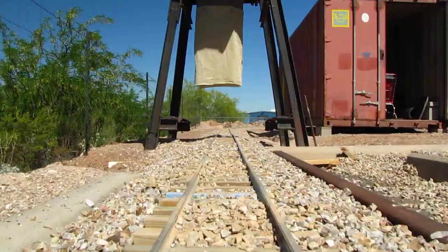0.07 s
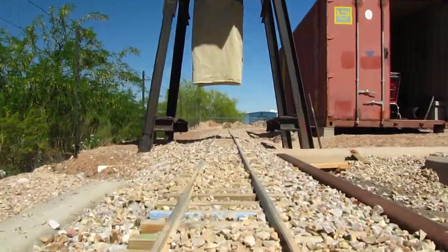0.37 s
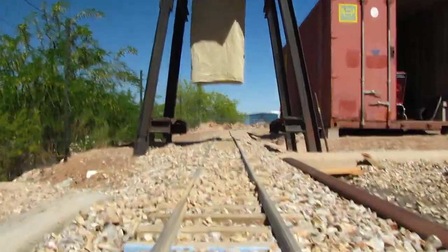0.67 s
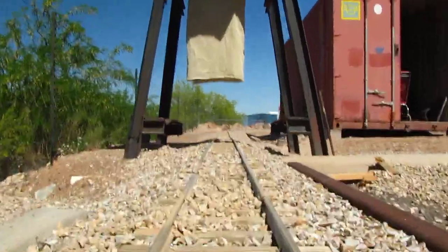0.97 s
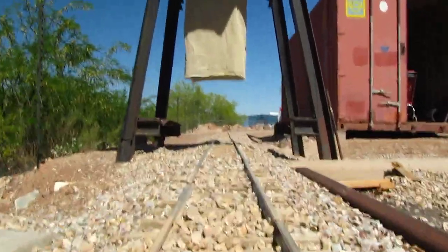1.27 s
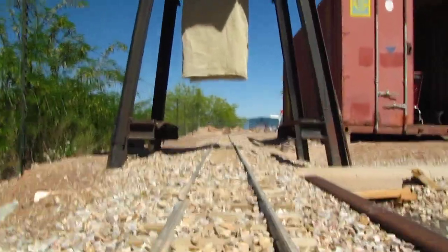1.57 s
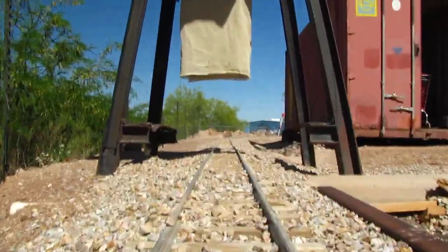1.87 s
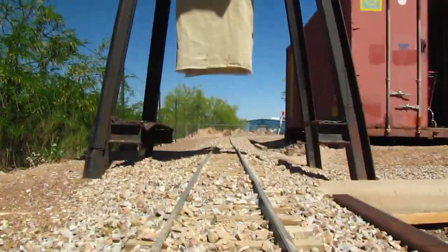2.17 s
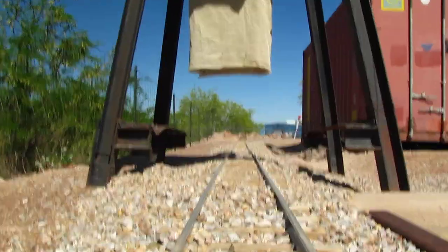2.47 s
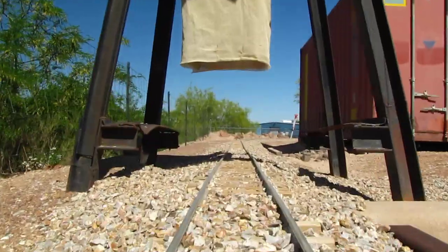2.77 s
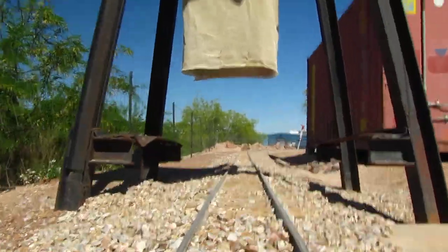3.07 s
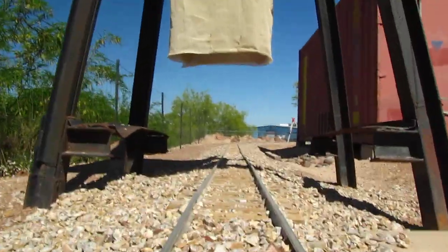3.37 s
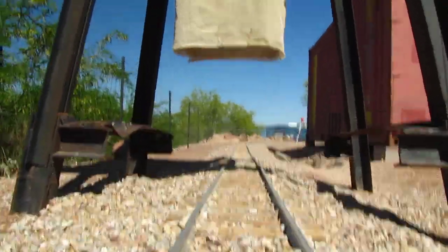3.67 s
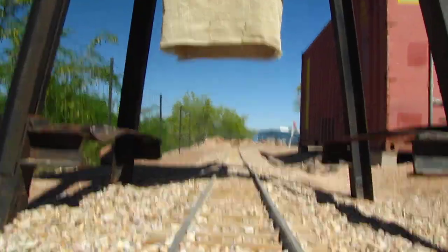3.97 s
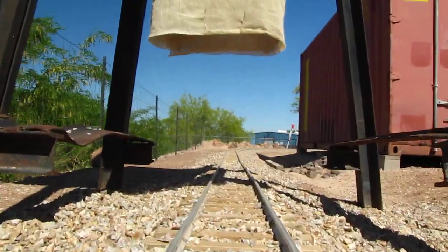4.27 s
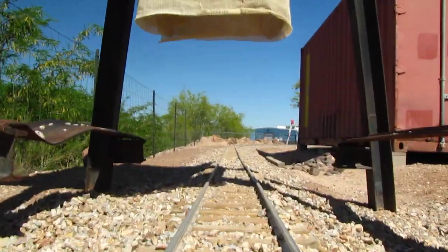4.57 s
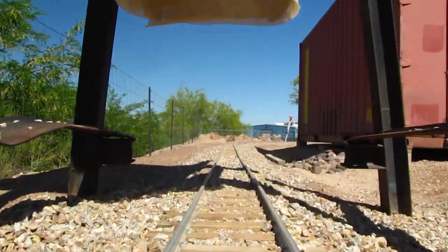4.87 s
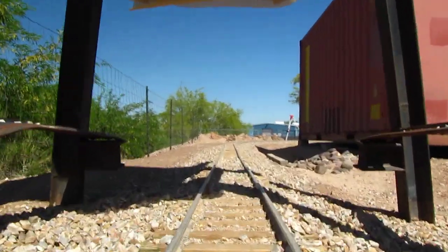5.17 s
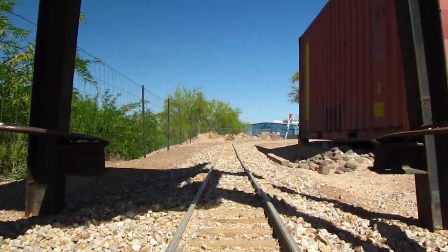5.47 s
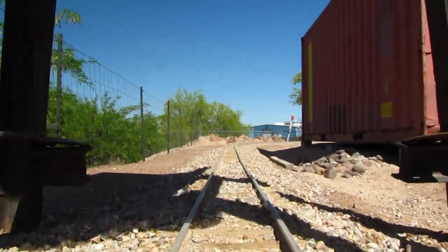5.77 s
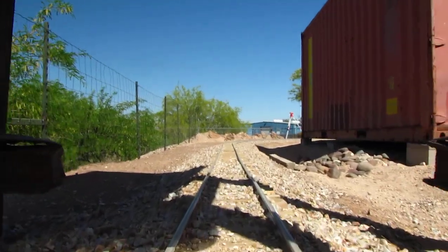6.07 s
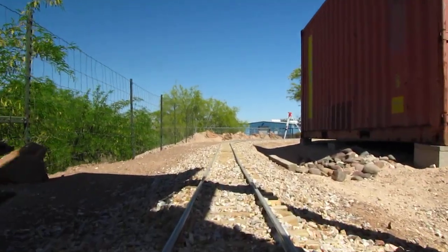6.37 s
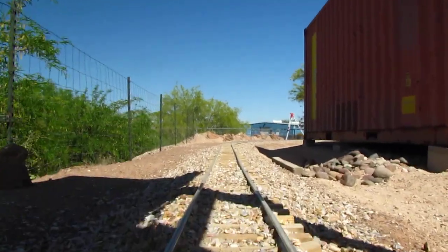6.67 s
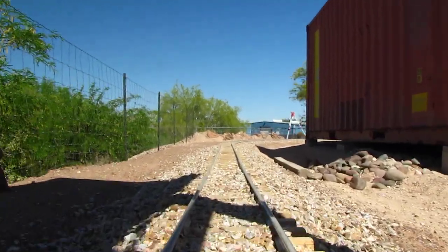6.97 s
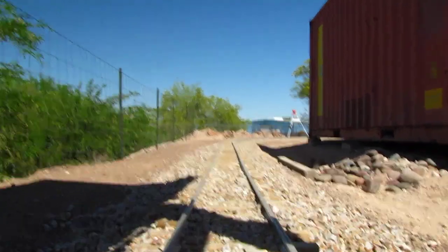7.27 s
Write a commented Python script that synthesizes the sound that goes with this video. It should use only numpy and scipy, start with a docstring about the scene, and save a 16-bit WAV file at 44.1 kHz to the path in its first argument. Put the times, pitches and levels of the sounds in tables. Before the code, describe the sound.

Stones crack and snap under the wheels of a miniature train, which jolts, quietens and then rumbles louder as it gathers speed.

```python
"""Miniature railway car on loose ballast

Heard on board, outdoors, on narrow track. Rail bumps keep body and wheels drumming. For two seconds
the car ploughs through heaped stones, which crunch, snap and ring its steel frame. It jolts over
a few last ones, then rolls clear and grows louder as the drive builds, while rail ripple raises
a climbing hum. Midway a faint high whistle sounds twice."""
import sys
import numpy as np
from scipy import signal
from scipy.io import wavfile
from scipy.ndimage import map_coordinates

SR = 44100
rng = np.random.default_rng(int(sys.argv[2]) if len(sys.argv) > 2 else 0)


def master_out(mix):
    """Clip the mix to full scale and print it as 16-bit PCM to the path in sys.argv[1]."""
    frames = np.transpose(np.atleast_2d(mix))
    ceiling = np.clip(frames, -1, 1)
    pcm = np.round(ceiling * 32767).astype(np.int16)
    wavfile.write(sys.argv[1], SR, pcm)


N = 327222

# wheels dropping off stones: t/s, knock/dB, knock f/Hz, crack/dB, crack decay/s, rattle/dB
JOLTS = [(0.7994, -2, 430, -17, 0.00093, -18), (2.215, -0.5, 400, -25.5, 0.0024, -15),
         (2.355, -2, 930, -31, 0.0032, -38), (2.9235, -2, 358, -26, 0.0023, -16.5),
         (3.079, -3.5, 626, -29.5, 0.0013, -22), (3.113, -4, 674, -24.5, 0.002, -20),
         (3.477, -2.5, 583, -28.5, 0.0049, -19.5), (3.484, -8, 435, -25, 0.0018, -32),
         (3.7, -2, 450, -25.5, 0.0031, -23.5)]
# modes of car body, wheels with axles, steel frame: f/Hz, width/Hz, level/dB
BODY_MODES = [(273.7, 33, -5), (331.7, 50, 1), (365.3, 26.2, -1)]
WHEEL_MODES = [(402.5, 73, -1), (574, 203, -7), (615, 65, -9.5), (863, 277, -9.5), (1162, 160, -11.5)]
FRAME_MODES = [(2080, 26, 9), (2886, 70, 3), (3430, 80, 2.5), (4300, 87, 0), (7210, 120, -7),
               (12600, 380, -18.5)]
# spectra of low rumble, breaking stone, sand and light pebbles: f/Hz, density/dB
RUMBLE_SPECTRUM = [(25, -28), (45, -17), (70, 1), (110, -1.5), (170, -5), (260, 6), (700, -28)]
STONE_SPECTRUM = [(200, -7), (600, 6), (1200, 10), (1900, 6), (2800, 3.5), (4600, 2), (6000, -22.5),
                  (7500, -0.5), (10000, -16.5), (16000, -28.5)]
SAND_SPECTRUM = [(2500, 7), (4000, 4), (7500, -4), (10000, -6), (16000, -19)]
LOOSE_DB, LOOSE_DRIVE = -50, 0.13   # stones scattered along the track; drive needed to crush them


def from_db(db):
    """Decibels to gain."""
    return 10 ** (np.asarray(db) / 20)


def unit_rms(x):
    """Scale to rms 1."""
    return x / np.sqrt(np.mean(x ** 2) + 1e-20)


def at_hz(table, hz):
    """Interpolate a table on a log-frequency axis."""
    freqs_hz, values = np.transpose(table)
    return np.interp(np.log(hz), np.log(freqs_hz), values)


def drift(rate_hz):
    """Smooth random wander, rms 1."""
    step, settle = 40, 2000
    r = np.exp(-2 * np.pi * rate_hz * step / SR)
    slow = signal.lfilter([1], [1, -2 * r, r * r], rng.standard_normal(N // step + settle + 2))[settle:]
    return np.interp(np.arange(N) / step, np.arange(len(slow)), unit_rms(slow))


def resonate(x, hz, *widths_hz):
    """Unity-peak resonators at one pitch, in series, one per width."""
    for width_hz in widths_hz:
        r = np.exp(-np.pi * width_hz / SR)
        feedback = [1, -2 * r * np.cos(2 * np.pi * hz / SR), r * r]
        x = signal.lfilter(np.array([1, 0, -1]) * (1 - r * r) / 2, feedback, x + 1e-18)
    return x


def stereo(pair, hz):
    """Mix two unrelated signals to left and right: alike in the bass, apart in the treble."""
    # left-right likeness: f/Hz, correlation
    likeness = [(40, 1), (150, 0.7), (350, 1), (650, 0.85), (1100, 0.058), (1600, 0.56), (2500, -0.28),
                (5500, -0.039)]
    alike = np.clip(at_hz(likeness, hz), -.99, .99)
    mid, side = np.sqrt((1 + alike) / 2) * pair[0], np.sqrt((1 - alike) / 2) * pair[1]
    return np.array([mid + side, mid - side])


def contacts(per_s, spread_db, length_s):
    """Force envelope of random brief contacts, many small, a few large; rms 1."""
    sizes = from_db(spread_db * np.minimum(rng.exponential(1, N), 3.5))
    energy = (rng.random(N) < per_s / SR) * sizes ** 2
    return unit_rms(np.sqrt(signal.lfilter([1], [1, -np.exp(-2 / (length_s * SR))], energy + 1e-18)))


def blows(times_s, level_db, decay_s):
    """Force envelope of decaying blows; longer ones start softer."""
    energy, t = np.zeros(N + SR), np.arange(SR // 5) / SR
    for start_s, db, tau_s in np.broadcast(times_s, level_db, decay_s):
        at = round(start_s * SR)
        rise = 1 - np.exp(-t / (.15 * tau_s))
        energy[at:at + len(t)] += (from_db(db + 2) * rise * np.exp(-t / tau_s)) ** 2
    return np.sqrt(energy[:N] + 1e-18)


def swells(rows, attack_s, release_s):
    """Gain that rises, holds and decays for each row."""
    t, power = np.arange(N) / SR, 0
    for start_s, length_s, db in rows:
        rise = np.clip((t - start_s) / attack_s, 0, 1)
        fall = np.exp(-np.maximum(t - start_s - length_s, 0) / release_s)
        power += (from_db(db) * rise * fall) ** 2
    return np.sqrt(power)


def add_pulse(out, sound, start_s, level_db, swell_s):
    """Mix in a sound under an envelope that peaks after swell_s, then fades."""
    at, t = round(start_s * SR), np.arange(sound.shape[-1]) / SR
    out[..., at:at + len(t)] += from_db(level_db) * sound * t / swell_s * np.exp(1 - t / swell_s)


def radiate(force, spectrum, wander_db=1.5, wander_hz=6):
    """A rough force sounds as noise in half-octave bands of wandering balance."""
    edges_hz = np.geomspace(22, 16500, 20)
    noise, out, power = rng.standard_normal((2, 2, N)) * force, 0, 0
    for k, (low, high) in enumerate(zip(edges_hz, edges_hz[1:])):
        if high < spectrum[0][0] or low > spectrum[-1][0]:
            continue
        hz = np.sqrt(low * high)
        gain = from_db(at_hz(spectrum, hz))
        band = signal.sosfilt(signal.butter(2, [low, high], "band", fs=SR, output="sos"), noise[k % 2])
        out += stereo(band, hz) * gain * unit_rms(from_db(wander_db * drift(wander_hz)))
        power += gain ** 2 * (high - low) * 2 / SR
    return out / np.sqrt(power)


def shake(force, modes, skirt_hz):
    """A rough force rings a set of modes; a wide second resonator steepens their skirts."""
    out, power = 0, 0
    for hz, width_hz, db in modes:
        ringing = resonate(rng.standard_normal((2, N)) * force, hz, width_hz, skirt_hz)
        out += from_db(db) * stereo(ringing, hz)
        power += from_db(db) ** 2 * np.pi * width_hz / SR
    return out / np.sqrt(power)


def rolling(drive, crush):
    """Rail bumps shake body and wheels, grit grinds beneath them; at speed the wheels hum."""
    # wheel hum at full speed: f/Hz, width/Hz, level/dB
    hum_modes = [(392.6, 43, -0.5), (493, 83, -7), (850, 46, -16)]
    # ground grit: f/Hz, density/dB
    grit_spectrum = [(300, -17), (700, 16), (1200, -3), (1700, 3.5), (2400, 1.5), (4000, -10.5),
                     (7000, -38), (15000, -32)]
    drag = (crush / from_db(LOOSE_DB)) ** 0.25   # stones under the rims make the wheels grind harder
    bumps = np.hypot(.6, 0.52 * contacts(per_s=170, spread_db=4.5, length_s=0.0027))
    body = shake(from_db(-20.5) * drive * bumps, BODY_MODES, skirt_hz=450)
    wheels = shake(from_db(-24.5) * drive * drag * bumps, WHEEL_MODES, skirt_hz=930)
    # rail ripple passes faster with speed, so the hum climbs
    travel = np.cumsum(.8 + .2 * drive)
    steady_hum = shake(bumps, hum_modes, skirt_hz=382)
    climbing_hum = np.array([np.interp(travel, np.arange(N), side) for side in steady_hum])
    hum = from_db(-15) * drive ** 3.24 * climbing_hum
    rumble = radiate(from_db(-35.5) * drive ** 0.75 * drag, RUMBLE_SPECTRUM)
    grit = radiate(from_db(-31.5) * drive ** 2.02 * bumps, grit_spectrum, wander_db=3)
    return body + wheels + hum + rumble + grit


def sand(drive, level_db=-59):
    """Sand on the rail ticks finely under the rims."""
    pops = contacts(per_s=180, spread_db=6, length_s=0.0035)
    return radiate(from_db(level_db) * np.tanh(drive / LOOSE_DRIVE) * pops, SAND_SPECTRUM)


def clinks(per_s, spread_db, q, pitches=40):
    """Each knocked stone rings briefly at its own pitch; rms 1."""
    # ringing stones: f/Hz, level/dB
    spectrum = [(1100, 15.5), (4200, -5.5), (8000, -16.5)]
    sizes = from_db(spread_db * np.minimum(rng.exponential(1, N), 3)) * (rng.random(N) < per_s / SR)
    clicks = sizes * rng.standard_normal((2, N))
    pitch_index, out = rng.integers(0, pitches, N), 0
    for k, hz in enumerate(np.geomspace(1500, 9000, pitches) * rng.uniform(.97, 1.03, pitches)):
        out += from_db(at_hz(spectrum, hz)) * resonate(clicks * (pitch_index == k), hz, hz / q)
    return unit_rms(out)


def ballast(crush):
    """Stones grind in tiny fractures, with sharp clicks on top, and ring the frame."""
    # crisp splinters of crushed stone: f/Hz, density/dB
    splinter_spectrum = [(7000, -11.5), (14000, -4)]
    grinding = contacts(per_s=3000, spread_db=1, length_s=.001) * from_db(1.5 * drift(20))
    clicks = contacts(per_s=140, spread_db=4, length_s=.0008)
    force = crush * np.hypot(from_db(-5.5) * grinding, from_db(-6.5) * clicks)
    frame = shake(force * from_db(-9), FRAME_MODES, skirt_hz=1500)
    load = np.sqrt(crush / crush.max())   # stones ring and splinter mainly under heavy load
    ringing = crush * load * from_db(-4) * clinks(per_s=350, spread_db=1, q=32)
    splinters = radiate(force * load * from_db(-25), splinter_spectrum)
    crunch = from_db(4) * radiate(force, STONE_SPECTRUM, wander_db=2, wander_hz=40)
    return crunch + frame + ringing + splinters


def breaking_stones():
    """Each stone splits, crumbles and thuds into the car; jolts also rattle the loose axles."""
    # stones hitting the frame: t/s, crack/dB, thud/dB, crack decay/s
    hits = [(0.406, -37, -18, 0.0061), (0.566, -28, -16, 0.0033), (0.593, -23, -14, 0.0047),
            (0.632, -23.5, -15, 0.0013), (0.704, -20, -23, 0.0017), (0.8525, -23, -9.5, 0.0017),
            (0.8648, -13.5, -23, 0.00094), (0.8815, -24.5, -32, 0.0013), (0.902, -19, -37, 0.00078),
            (0.932, -23, -32, 0.0041), (0.957, -24.5, -20.5, 0.0067), (1.031, -27.5, -15.5, 0.0049),
            (1.141, -24.5, -15.5, 0.01), (1.179, -18.5, -11, 0.0028), (1.197, -26, -16, 0.0025),
            (1.232, -24.5, -14, 0.0022), (1.354, -18.5, -15.5, 0.0018), (1.52, -29.5, -16, 0.0064),
            (1.571, -19, -16.5, 0.0028), (1.873, -27, -16.5, 0.0043), (1.931, -20.5, -22.5, 0.0055),
            (2.039, -32, -16, 0.0061), (2.15, -18.5, -25, 0.0027), (2.194, -18.5, -15, 0.0027),
            (2.29, -26.5, -15, 0.0051), (2.321, -25, -34, 0.0042), (2.395, -18.5, -45, 0.00083),
            (2.986, -27, -40, 0.0019), (3.417, -15, -27, 0.002), (3.532, -19, -40, 0.0022),
            (3.638, -36.5, -26.5, 0.0074), (3.994, -39, -30, 0.0061), (4.783, -31, -32, 0.0047),
            (5.311, -27, -22, 0.002), (5.692, -47, -20, 0.005), (5.815, -45, -28, 0.0075),
            (6.826, -44, -27, 0.0034), (7.042, -42, -17, 0.0035), (7.385, -38, -15.5, 0.0042)]
    jolt_s, knock_db, _, crack_db, crack_decay_s, rattle_db = np.transpose(JOLTS)
    # the wheel bounces once after each jolt
    bounces = np.column_stack([jolt_s + 0.027, crack_db + 0.5, rattle_db, crack_decay_s])
    snap_s, snap_db, thud_db, snap_decay_s = np.vstack([hits, bounces]).T
    split = blows(np.r_[snap_s, jolt_s], np.r_[snap_db, crack_db] + 7, decay_s=0.0003)
    crack = np.hypot(blows(snap_s, snap_db + 4.5, snap_decay_s),
                     blows(jolt_s, crack_db + 14.5, crack_decay_s))
    crumble = np.hypot(blows(snap_s, snap_db, 3.7 * snap_decay_s),
                       blows(jolt_s, crack_db + 3, 7.6 * crack_decay_s))
    crumble *= contacts(per_s=620, spread_db=3, length_s=0.0015)
    force = np.sqrt(split ** 2 + crack ** 2 + crumble ** 2)
    frame = shake(force * from_db(-9), FRAME_MODES, skirt_hz=1500)
    thud = np.hypot(blows(snap_s, thud_db + 5.5, 2.15 * snap_decay_s),
                    blows(jolt_s, knock_db - 5, 2.33 * crack_decay_s))
    car = shake(thud, BODY_MODES + WHEEL_MODES, skirt_hz=1360)
    rumble = radiate(thud * from_db(-17), RUMBLE_SPECTRUM, wander_db=7, wander_hz=20)
    rattle = blows(jolt_s, rattle_db - 1.5, decay_s=0.033)
    rattle *= contacts(per_s=110, spread_db=-14.5, length_s=0.009)
    axles = shake(rattle, WHEEL_MODES, skirt_hz=1470)
    cracking = radiate(force, STONE_SPECTRUM, wander_db=2.5, wander_hz=80)
    return cracking + frame + car + rumble + axles


def jolts():
    """A wheel drops back on the rail: a hard clunk, dead within a few cycles."""
    # knock partials: f/pitch, level/dB
    partials = [(.38, -13.5), (.68, -10), (1, -1.5), (1.5, -12)]
    out, t = np.zeros(N), np.arange(SR // 20) / SR
    for start_s, knock_db, hz, *_ in JOLTS:
        spacing = rng.uniform(.8, 1.25)
        ringing = sum((-1) ** k * from_db(db) * np.sin(2 * np.pi * ratio ** spacing * hz * t)
                      for k, (ratio, db) in enumerate(partials))
        add_pulse(out, ringing, start_s, knock_db, swell_s=0.0013)
    return signal.sosfilt(signal.butter(1, 150, "high", fs=SR, output="sos"), out + 1e-18)


def chinks(width_hz=120, skirt_hz=690):
    """Stone rubs on steel: one narrow pitch swells and fades."""
    # stone on steel: t/s, f/Hz, level/dB, swell/s
    rubs = [(0.8, 4950, -11, 0.00083), (0.935, 3200, -28, 0.0025), (0.985, 4230, -33, 0.0065),
            (3.418, 2170, -23, 0.0031), (3.482, 1625, -16, 0.0038), (3.698, 2880, -19, 0.0014),
            (4.784, 1940, -27, 0.0066), (6.775, 5064, -49, 0.0044), (6.997, 5080, -43.5, 0.0061)]
    out = np.zeros((2, N))
    for start_s, hz, level_db, swell_s in rubs:
        tone = unit_rms(resonate(rng.standard_normal((2, SR // 10)), hz, width_hz, skirt_hz))
        add_pulse(out, tone, start_s, level_db, swell_s)
    return out


def pebble_ticks(width_ratio=0.37):
    """A pebble flicked aside gives a dry broadband tick, higher if it is smaller."""
    # single pebbles: t/s, f/Hz, level/dB
    flicks = [(2.5, 1250, -30), (2.579, 1970, -33), (2.758, 1670, -33.5), (2.815, 1640, -24.5),
              (4.038, 1180, -27.5), (4.325, 1100, -28), (4.899, 1940, -34), (5.235, 1003, -24),
              (5.879, 4300, -37), (5.888, 5600, -37)]
    out = np.zeros((2, N))
    for start_s, hz, level_db in flicks:
        width_hz = hz * width_ratio
        burst = unit_rms(resonate(rng.standard_normal((2, SR // 20)), hz, width_hz, width_hz))
        add_pulse(out, stereo(burst, hz), start_s, level_db, swell_s=0.0018)
    return out


def faint_high_whistle():
    """A faint, broken high whistle of wavering pitch, with thin hiss."""
    # whistle spans: t/s, length/s, level/dB
    spans = [(2.75, 0.95, -53.5), (3.93, 0.83, -55.5)]
    # whistle and hiss bands: f/Hz, width/Hz, level/dB
    bands = [(3630, 1400, 12), (6240, 110, 13), (7450, 150, 8), (9000, 290, 7), (10700, 2800, -5)]
    steady = shake(contacts(per_s=300, spread_db=2.5, length_s=0.008), bands, skirt_hz=2500)
    position = np.cumsum(1 + .035 * drift(7))
    wavering = np.array([map_coordinates(side, [position], mode="mirror") for side in steady])
    return swells(spans, attack_s=0.019, release_s=0.044) * wavering


def pebble_skitters():
    """Light pebbles slide aside in a thin, bright rattle."""
    # sliding pebbles: t/s, level/dB
    slides = [(3.881, -42.5), (5.141, -34.5), (6.6, -37), (7.155, -37.5)]
    times_s, level_db = np.transpose(slides)
    rattle = contacts(per_s=800, spread_db=2, length_s=.001)
    return radiate(blows(times_s, level_db, decay_s=0.018) * rattle, SAND_SPECTRUM)


def scene():
    """The car from on board, the stones slightly to the right."""
    # how hard the wheels run on the rail; collapses at the jolts, then builds: t/s, drive/0-1
    drive_curve = [(0, 0.79), (.2, 0.72), (.6, 0.84), (.95, 0.51), (1.5, 0.75), (2.2, 0.71), (2.42, 0.09),
                   (2.8, 0.23), (3.4, 0.2), (3.82, 0.09), (4.15, 0.23), (5.32, 0.48), (5.55, 0.35),
                   (5.75, 0.6), (6.2, 0.65), (6.6, .87), (7.15, 1)]
    # stones heaped by the rails: t/s, length/s, level/dB
    heaps = [(.34, 0.2, -42.5), (.52, 0.38, -33), (.94, 0.25, -29), (1.22, 0.99, -30.5),
             (2.28, 1.06, -47.5), (3.01, 0.05, -33.5), (3.35, 0.098, -36.5)]
    drive = np.interp(np.arange(N) / SR, *np.transpose(drive_curve))
    loose = from_db(LOOSE_DB) * np.tanh(drive / LOOSE_DRIVE)
    crush = np.hypot(loose, swells(heaps, attack_s=.04, release_s=.05))
    stones = ballast(crush) + breaking_stones() + sand(drive)
    stones += pebble_skitters() + pebble_ticks() + chinks()
    pan_db = [[-1], [1]]
    return rolling(drive, crush) + faint_high_whistle() + jolts() + stones * from_db(pan_db)


def record(dry):
    """The hardest knocks overload the microphone; the top is cut."""
    cutoff_hz = 16100
    clipped = dry / (1 + dry ** 6) ** (1 / 6)
    return signal.sosfilt(signal.ellip(10, .1, 80, cutoff_hz, fs=SR, output="sos"), clipped)


dry = scene()
out = record(dry)
master_out(out)
```